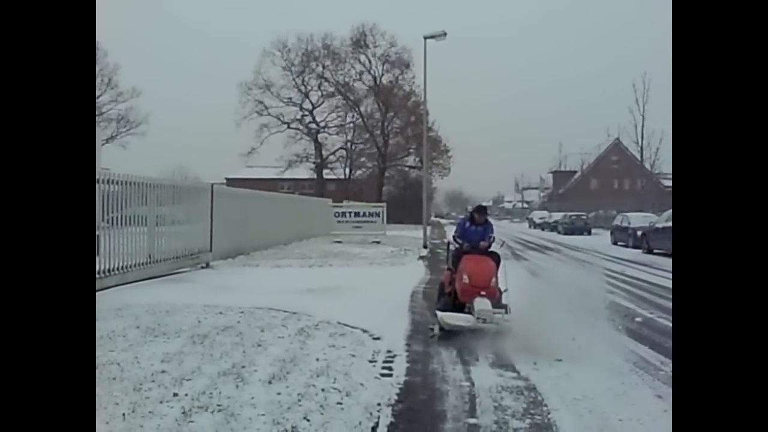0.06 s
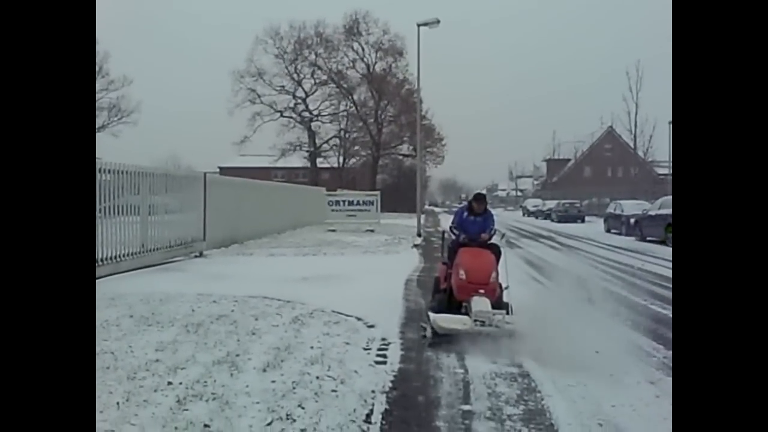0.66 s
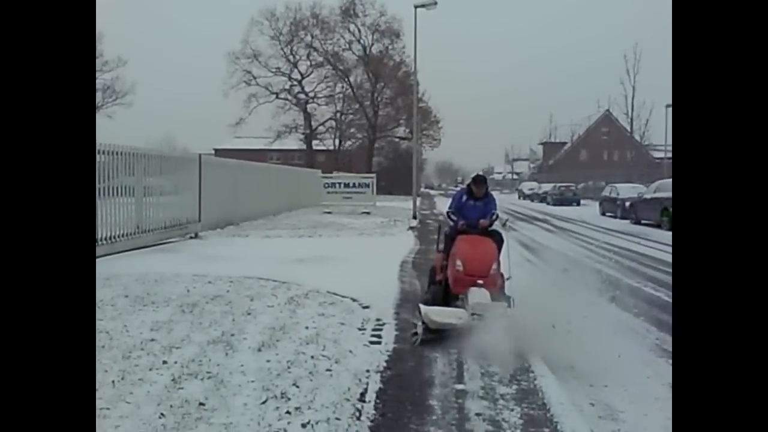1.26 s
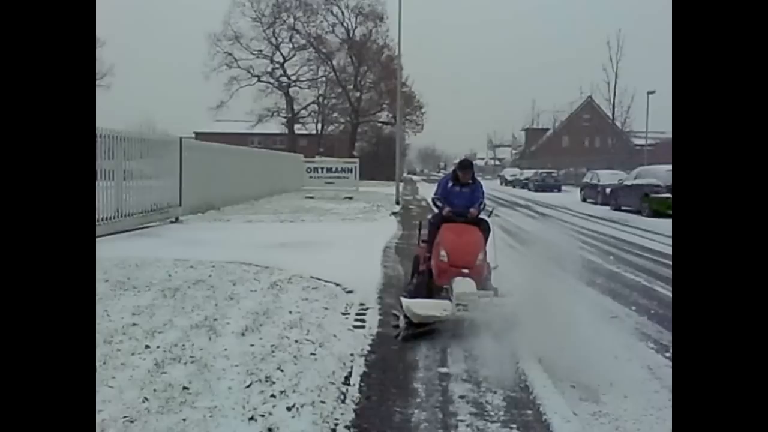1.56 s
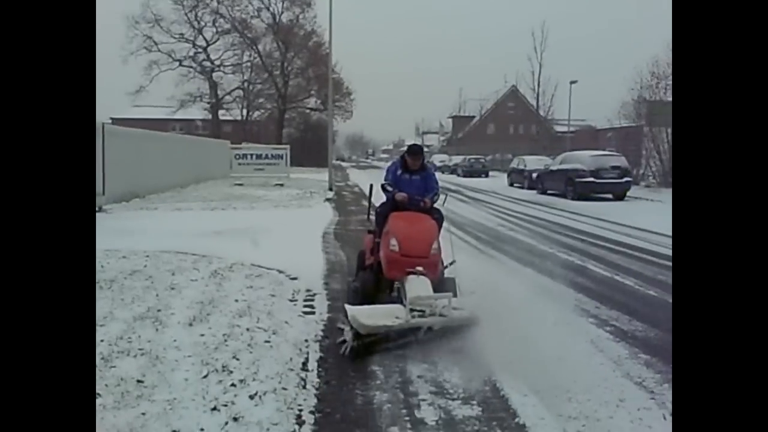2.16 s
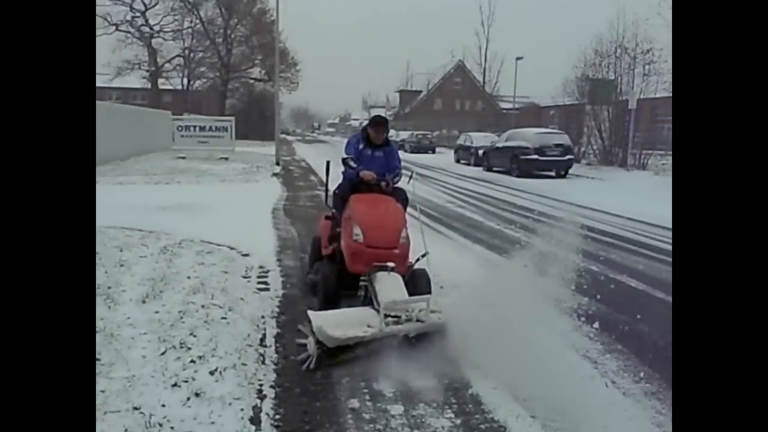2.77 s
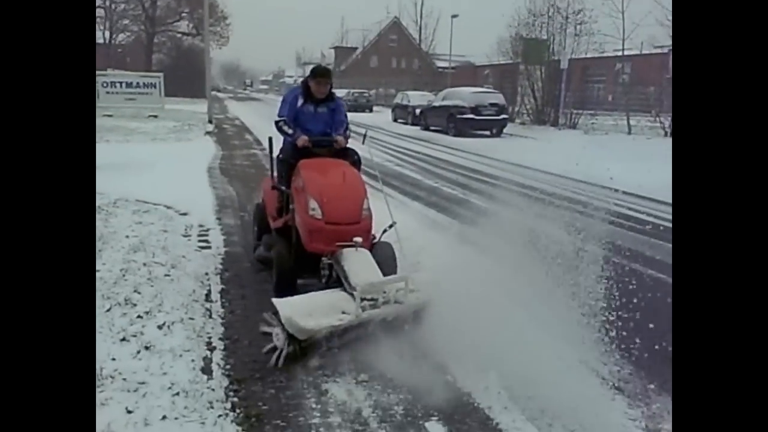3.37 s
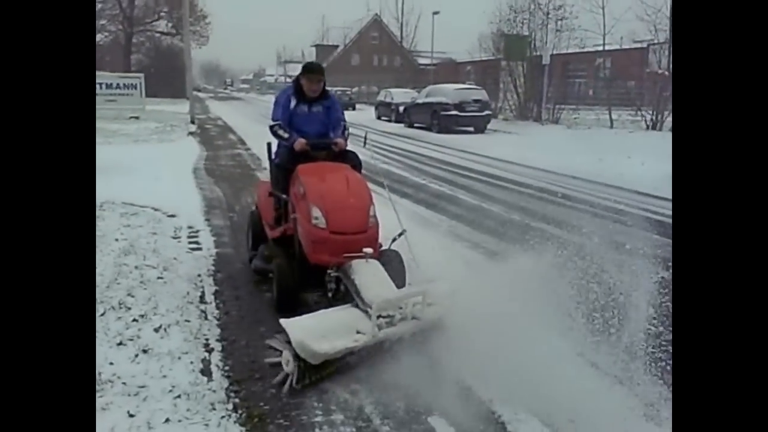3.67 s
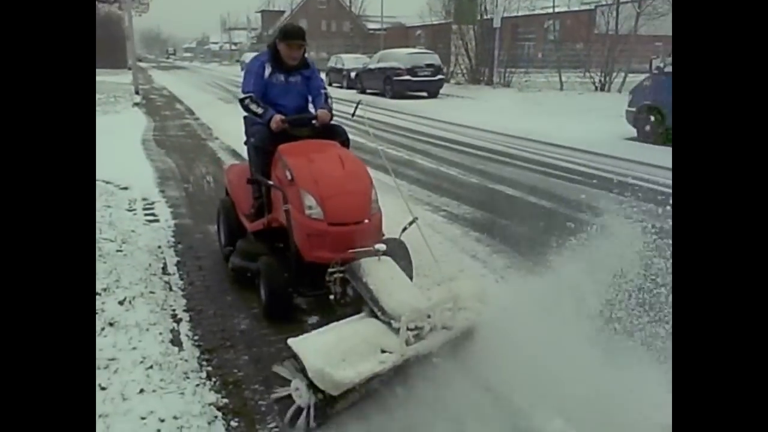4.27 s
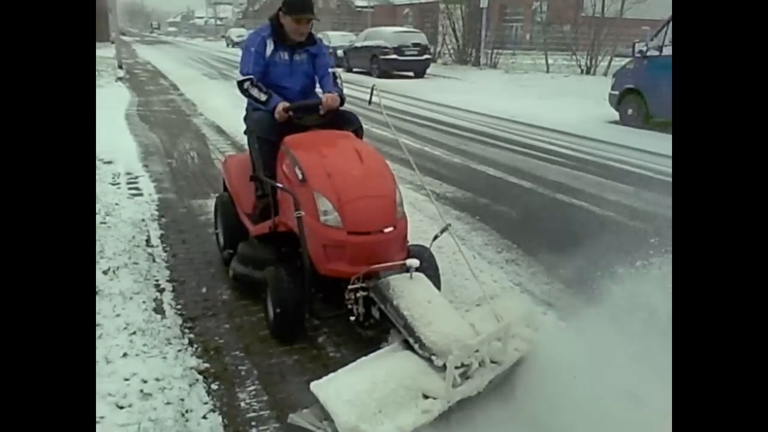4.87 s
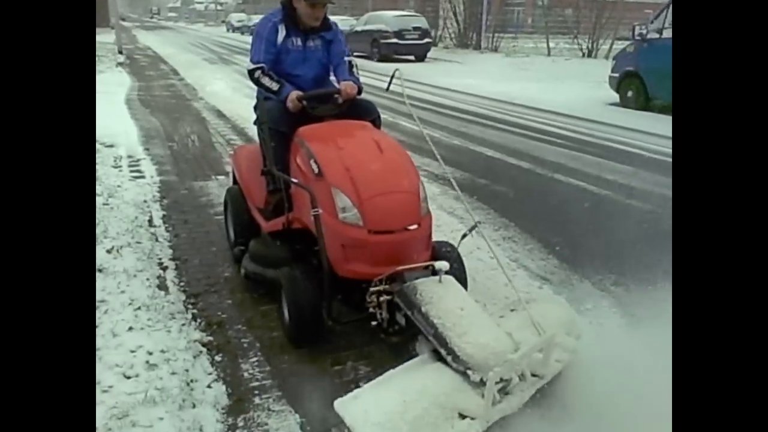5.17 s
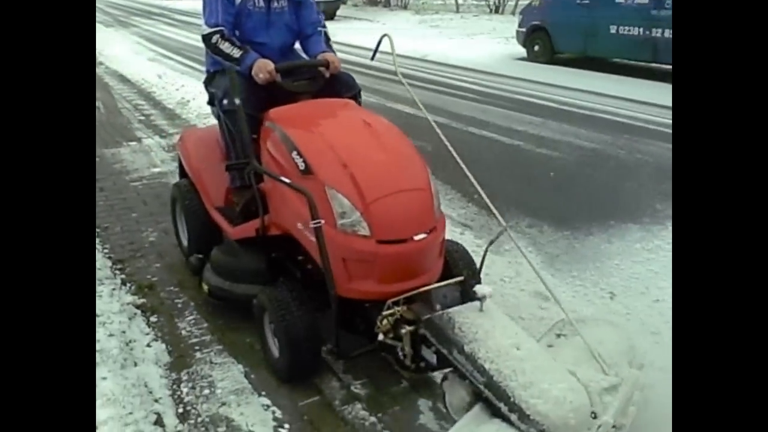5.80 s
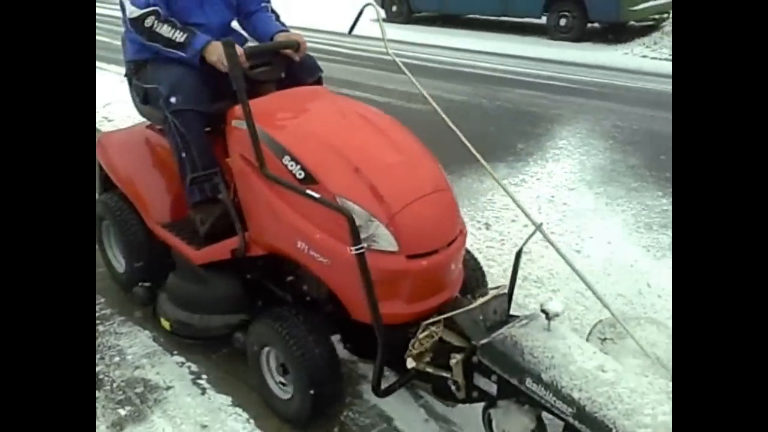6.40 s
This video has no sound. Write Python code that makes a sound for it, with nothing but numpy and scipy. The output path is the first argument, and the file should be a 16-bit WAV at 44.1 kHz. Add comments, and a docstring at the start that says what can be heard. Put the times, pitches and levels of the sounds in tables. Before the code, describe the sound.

Outdoors, the throbbing drone of a small engine grows steadily louder as a ride-on snow sweeper nears the microphone. Engine rattle and whining gears mix with the scrape of bristles and the hiss of flung snow. A brief patch of grit rings on the brush guard near the start, a thin high whine rises and fades midway, and a body panel buzzes briefly at the end, with the machine close by.

```python
"""A ride-on sweeper drives up a snowy pavement towards the microphone.
From the start its two-cylinder engine fires in uneven pairs, slowly speeding up and sagging under the
load; the tailpipe hums, gears whine, the bonnet rings, and the brush scrapes and sprays hissing snow.
In the first two seconds grit hits the brush guard. Near four seconds the brush gear sings loudest.
By the end the machine is close and loud, and a panel gives one last short buzz."""
import sys
import numpy as np
from scipy import signal
from scipy.fft import rfft, irfft, next_fast_len
from scipy.io import wavfile
from scipy.ndimage import uniform_filter1d

SR = 44100
rng = np.random.default_rng(int(sys.argv[2]) if len(sys.argv) > 2 else 0)


def waveform_to_disk(signal):
    """Save audio, clipped to [-1, 1], as 16-bit WAV at the path in sys.argv[1]."""
    frames = np.transpose(np.atleast_2d(signal))
    scaled = np.clip(frames, -1, 1) * 32767
    samples = np.round(scaled).astype(np.int16)
    wavfile.write(sys.argv[1], SR, samples)


N = 288414
TIME = np.arange(N) / SR
CRUISE_HZ = 27  # usual engine cycles a second; one cycle is two turns of the crankshaft

# The engine speed rises and falls under the load: time_s, cycles_per_s
ENGINE_SPEED = [(0.0, 27.04), (0.22, 26.98), (0.89, 27.35), (1.36, 26.3), (1.55, 26.36), (1.83, 27.75),
                (2.39, 27.89), (3.06, 25.82), (3.22, 25.91), (3.56, 27.19), (4.03, 28.06), (4.25, 27.74),
                (4.64, 26.19), (4.87, 25.98), (5.34, 27.32), (5.73, 27.55), (6.12, 28.0), (6.54, 26.88)]
# When and how hard each of the two cylinders fires: share_of_cycle, strength
CYLINDER_FIRINGS = [(.516, .87), (.9, 1.0)]
# The echo off the ground cancels a band of sound, which sinks as the machine nears: time_s, pitch_hz
CANCELLED_BAND = [(0, 694), (2, 728), (3.5, 592), (5, 499), (5.7, 449), (6.2, 381), (6.54, 358)]
# How much snow the brush throws: time_s, level_db
SNOW_THROWN = [(0.05, -48.5), (1.4, -46), (1.59, -47), (1.63, -53.5), (1.88, -56.5), (2.03, -46.5),
               (2.15, -51.5), (2.22, -48.5), (3.0, -40), (4.07, -45), (4.13, -41.5), (4.9, -41),
               (4.94, -43.5), (5.83, -42), (6.5, -39)]


def exhaust(cycles, dip_db=16, dip_octaves=0.21, boost_octaves=0.24, waver_db=0.62, puff_db=-17):
    """Each firing is a push and pull of air that echoes in the silencer, with a puff of swirling gas."""
    # Exhaust tones; an order is a multiple of the engine's cycle rate: order, relative_db
    tones = [(1, -18.5), (2, -9), (3, -9.5), (4, -22), (5, 0), (6, -0.5), (7, -14.5), (8, -1.5), (9, -4.5),
             (10, -10.5), (11, -13.5), (12, -26.5), (13, -12), (14, -13), (15, -24.5), (17, -27),
             (18, -24.5), (19, -19.5), (20, -28.5), (21, -18.5), (22, -19)]
    # Upside-down echoes from the silencer's open end: delay_share_of_cycle, strength
    pipe_echoes = [(.209, -.41), (.264, -.6)]
    # Tone colour of the gas puffs: pitch_hz, relative_db
    puff_spectrum = [(30, -22), (85, -11), (130, -7), (180, -1), (260, 4.5), (330, 2), (400, -5),
                     (470, -11.5), (560, -26.5)]
    speed, dip_hz = curve(ENGINE_SPEED), curve(CANCELLED_BAND)
    # Just below the cancelled band the ground echo adds sound; close by, the direct sound outweighs it.
    boost_hz = 0.67 * dip_hz
    boost_db = np.interp(distance(), [3.2, 3.4], [0, 3])
    pulses = np.zeros(N)
    for order, db in tones:
        pair = sum(size * np.exp(-2j * np.pi * order * at) for at, size in CYLINDER_FIRINGS)
        pipe = 1 + sum(size * np.exp(-2j * np.pi * order * delay) for delay, size in pipe_echoes)
        phase = np.angle(pair * pipe) - np.pi / 6  # firings and echoes set each tone's timing
        tone = np.sin(2 * np.pi * order * cycles + phase)
        dip = np.exp(-(np.log2(order * speed / dip_hz) / dip_octaves) ** 2)
        boost = np.exp(-(np.log2(order * speed / boost_hz) / boost_octaves) ** 2)
        pulses += amp(db - dip_db * dip + boost_db * boost + waver_db * wander(1.3)) * tone
    pulses *= 1 + 0.049 * wander(25)  # no two burns are alike
    gas = rng.standard_normal(N) * throb(cycles, depth=0.24, lag=0.01, sharpness=12)
    puffs = amp(puff_db) * colour(gas, puff_spectrum)
    return loudness(level_db=-28.5, halving_db=6, rev_db=0.6) * (unit(pulses) + puffs)


def clatter(cycles, far_db=-40.5, flicker_db=0.5, ring_hz=1348, hollow_depth=0.43):
    """Valves, pistons and belts rattle in time with the firings; the tone colour shifts with distance."""
    # Tone colour from far off, midway and close by: pitch_hz, relative_db
    far_spectrum = [(330, -29.5), (400, -4.5), (500, -5), (600, -4.5), (720, -6.5), (850, -4.5),
                    (1050, -1.5), (1220, -15), (1400, -6.5), (1600, -11.5), (1830, -19), (2100, -18),
                    (2330, -12.5), (2600, -17), (2900, -30), (3200, -42)]
    mid_spectrum = [(330, -29), (400, -5), (500, -5), (580, 2.5), (700, -3), (800, -4), (930, -2.5),
                    (1150, -2), (1400, -2), (1530, -5), (1720, -12.5), (2050, -10), (2350, -12),
                    (2600, -11), (2900, -24), (3200, -45.5)]
    near_spectrum = [(330, -26.5), (400, -12.5), (470, -11), (540, -1.5), (700, -3.5), (850, -2),
                     (1150, -6.5), (1350, -4.5), (1570, -5.5), (1760, -12.5), (1900, -15.5), (2130, -11.5),
                     (2330, -7.5), (2550, -12.5), (2900, -19.5), (3200, -45.5)]
    # A quieter band in the clatter moves as the machine nears: time_s, pitch_hz
    hollow = [(1.5, 1880), (2.0, 1640), (2.7, 1610), (4.0, 1774), (6.54, 1850)]
    rattle = grains(per_s=12000, spread_db=1.5) * throb(cycles, depth=0.18, lag=0.024, sharpness=6.1)
    rattle *= amp(flicker_db * wander(22))
    far = np.interp(distance(), [5.1, 7.16], [0, 1])
    near = np.interp(distance(), [3.5, 4.6], [1, 0])
    sound = far * colour(rattle, far_spectrum)
    sound += (1 - far - near) * colour(rattle, mid_spectrum)
    sound += near * colour(rattle, near_spectrum)
    sound -= hollow_depth * resonate(sound, curve(hollow), width_hz=330)
    shaken_db = -13 + 5 * (curve(ENGINE_SPEED) - CRUISE_HZ)  # the bonnet rings harder at high speed
    ring = unit(resonate(rng.standard_normal(N), ring_hz, width_hz=60))
    bonnet = amp(shaken_db) * (1 - 0.8 * far) * ring
    close_level = loudness(level_db=-36.5, halving_db=7, rev_db=0.06)
    level = far * amp(far_db) + (1 - far) * close_level  # steady while far off
    return level * (sound + bonnet)


def brush(cycles, usual_snow_db=-44, spray_db=-0.18, flicker_db=0.5):
    """Bristles, shaken by the engine, flick over the paving and fling grains of snow."""
    # Tone colour of the scraping bristles and of the flying snow: pitch_hz, relative_db
    scrape_spectrum = [(2400, -33), (2800, -0.5), (3200, 2), (3600, 0.5), (4000, -0.5), (4500, -2.5),
                       (4900, -13.5), (5500, -28)]
    spray_spectrum = [(4200, -25), (4700, -6), (5000, -4), (5400, -2), (5750, -1.5), (6150, 0), (6450, -1),
                      (6700, -7.5), (6900, -16.5), (7100, -28.5), (7350, -47.5)]
    snow_db = curve(SNOW_THROWN)
    bristles = grains(per_s=16000, spread_db=1.6) * throb(cycles, depth=0.27, lag=0.04, sharpness=4)
    load = amp(0.5 * (snow_db - usual_snow_db))  # more snow scrapes louder
    scrape = loudness(level_db=-47, halving_db=5.5, rev_db=0.05) * load * colour(bristles, scrape_spectrum)
    spray = amp(snow_db + spray_db) * colour(grains(per_s=22000, spread_db=1.5), spray_spectrum)
    return (scrape + spray) * amp(flicker_db * wander(24))


def drive_whine(cycles, waver_db=2.5, jitter=0.23):
    """Tones of the crankshaft and drive swell as they glide past the pitches where the bonnet rings."""
    # The whining tones, as two matching lists: order; relative_db
    orders = [24, 26, 28, 30, 32, 36, 40, 44, 54, 60, 80, 84]
    levels_db = [-16, -16, -14.5, -27, -18.5, -19, -16.5, -24, -29, -22.5, -31, -30]
    # Where the bonnet panels ring: pitch_hz, width_hz, lift_db
    panels = [(716, 14, 6), (1150, 23, 4)]
    out = np.zeros(N)
    for order, db in zip(orders, levels_db):
        panels_db = sum(lift(order, *panel) for panel in panels)
        angle = 2 * np.pi * (order * cycles + rng.random()) + jitter * wander(8.3)
        out += amp(db + panels_db + waver_db * wander(3.3)) * np.sin(angle)
    return loudness(level_db=-37.5, halving_db=11.5, rev_db=0.5) * out


def tailpipe_hum(cycles, order=16, flutter=0.074, dip_octaves=0.15):
    """One tone swells near the tailpipe's own pitch and vanishes where the ground echo cancels it."""
    tone = np.sin(2 * np.pi * order * (cycles - CYLINDER_FIRINGS[1][0]))
    tone = unit(tone * (1 + flutter * wander(11)))
    octaves_apart = np.log2(order * curve(ENGINE_SPEED) / curve(CANCELLED_BAND))
    ground_gain = abs(octaves_apart) / np.hypot(octaves_apart, dip_octaves)
    pipe_gain = amp(lift(order, hz=447.3, width_hz=22.5, peak_db=8))
    return loudness(level_db=-46, halving_db=2, rev_db=-0.5) * pipe_gain * ground_gain * tone


def singing_panels(cycles, jitter=0.11, flutter=0.21):
    """Three wavering tones of the drive sing out when high speed carries them to a panel's own pitch."""
    # Each tone and its panel: order, level_db, halving_db, panel_hz, width_hz, lift_db
    tones = [(42, -58, 7.5, 1176, 16, 10), (48, -59, 6.5, 1334, 33, 9.5), (56, -59.5, 21.5, 1562, 30, 5)]
    # Now and then a panel buzzes louder for a moment: middle_s, half_length_s, order, lift_db
    buzzes = [(0.7, .2, 48, 6), (1.92, .13, 48, 5.5), (3.95, .28, 48, 7), (4.118, 0.41, 42, 7.5),
              (6.31, 0.17, 48, 14.5)]
    out = np.zeros(N)
    for order, db, halving_db, *panel in tones:
        buzz_db = sum(peak * swell(middle, half) for middle, half, which, peak in buzzes if which == order)
        tone = np.sin(2 * np.pi * order * cycles + jitter * wander(16))
        tone *= 1 + flutter * wander(5.3)
        out += loudness(db, halving_db, rev_db=-1.5) * amp(lift(order, *panel) + buzz_db) * unit(tone)
    return out


def brush_guard(ring_hz=890, ring_db=-52.5, sizzle_db=-13):
    """Bristles and snow keep the metal guard over the brush ringing; each patch of grit makes it swell."""
    # Patches of grit flung at the guard: middle_s, half_length_s, ring_db, sizzle_db
    grit = [(0.8, 0.48, -62, -56.5), (1.383, 0.11, -42, -53), (1.67, 0.061, -54, -62)]
    sizzle_hz = np.interp(TIME, [0.5, 1.3], [6090, 6220])
    ring = unit(resonate(grains(per_s=900, spread_db=3.5), ring_hz, width_hz=120))
    sizzle = unit(resonate(grains(per_s=4300, spread_db=1.5), sizzle_hz, width_hz=240))
    out = amp(ring_db) * ring + amp(curve(SNOW_THROWN) + sizzle_db) * sizzle
    for middle, half, grit_ring_db, grit_sizzle_db in grit:
        out += swell(middle, half) * (amp(grit_ring_db) * ring + amp(grit_sizzle_db) * sizzle)
    return out


def brush_gear(order=75.7, jitter=0.35, flutter=0.25):
    """The brush gear sings thinly; its belt slips, so its pitch sags more than the engine's does."""
    # How loud the gear sings: time_s, level_db
    levels = [(0, -70), (3.2, -58), (3.9, -50), (5.3, -56), (6.54, -66)]
    speed = curve(ENGINE_SPEED)
    belt_grip = (speed / speed.max()) ** (2 / 3)
    waves = np.cumsum(order * speed * belt_grip) / SR
    tone = np.sin(2 * np.pi * waves + jitter * wander(18))
    tone *= 1 + flutter * wander(18)
    return amp(curve(levels)) * unit(tone)


def distance(start_m=8.87, drive_m_per_s=1.304, aside_m=2.944):
    """Metres from the machine to the microphone, which stands to one side of its path."""
    return np.hypot(start_m - drive_m_per_s * TIME, aside_m)


def loudness(level_db, halving_db, rev_db):
    """Gain: level_db at 5 m, plus halving_db as distance halves and rev_db per extra cycle a second."""
    halvings = np.log2(5 / distance())
    return amp(level_db + halving_db * halvings + rev_db * (curve(ENGINE_SPEED) - CRUISE_HZ))


def throb(cycles, depth, lag, sharpness):
    """A level that swells just after each firing; lag is a share of the cycle."""
    bursts = sum(size * np.exp(sharpness * (np.cos(2 * np.pi * (cycles - at - lag)) - 1))
                 for at, size in CYLINDER_FIRINGS)
    return unit(1 + depth * bursts)


def grains(per_s, spread_db):
    """Tiny impacts at random moments, a few of them larger."""
    size = amp(spread_db * np.minimum(rng.exponential(1, N), 4))
    return unit(size * rng.standard_normal(N) * (rng.random(N) < per_s / SR))


def lift(order, hz, width_hz, peak_db):
    """Decibels that an engine tone gains near the pitch at which a part rings."""
    return peak_db / (1 + (2 * (order * curve(ENGINE_SPEED) - hz) / width_hz) ** 2)


def resonate(x, hz, width_hz):
    """Keeps the band around hz (a number or a curve): shifts it to zero, smooths twice, shifts back."""
    turn = np.exp(2j * np.pi * np.cumsum(hz * np.ones(N)) / SR)
    decay = np.exp(-np.pi * width_hz / SR)
    smoothed = signal.lfilter([(1 - decay) ** 2], [1, -2 * decay, decay ** 2], x / turn)
    return 2 * (turn * smoothed).real


def colour(x, spectrum):
    """Gives x a tone colour, silent beyond the table's ends, at an average level of 1."""
    size = next_fast_len(N)
    hz, db = np.transpose(spectrum)
    log_hz = np.log(np.fft.rfftfreq(size, 1 / SR) + 1)
    gain = amp(np.interp(log_hz, np.log(hz + 1), db, left=-np.inf, right=-np.inf))
    return unit(irfft(rfft(x, size) * gain, size)[:N])


def wander(per_s):
    """A smooth random drift of typical size 1 that changes about per_s times a second."""
    count = N // 64
    keep_slow = np.exp(-(np.fft.rfftfreq(count, 64 / SR) / per_s) ** 2)
    drift = irfft(rfft(rng.standard_normal(count)) * keep_slow, count)
    return np.interp(np.arange(N) / 64, np.arange(count), unit(drift))


def swell(middle_s, half_s):
    """A smooth rise and fall, 1 at its middle."""
    return np.exp(-((TIME - middle_s) / half_s) ** 2)


def curve(rows):
    """Joins rows of time and value with straight lines."""
    return np.interp(TIME, *np.transpose(rows))


def amp(db):
    """Decibels to gain."""
    return 10 ** (np.asarray(db) / 20)


def unit(x):
    """Scales to an average (rms) level of 1."""
    return x / np.sqrt(np.mean(x ** 2) + 1e-20)


def scene():
    """Engine and brush follow the one crankshaft, whose flywheel smooths the speed."""
    cycles = np.cumsum(uniform_filter1d(curve(ENGINE_SPEED), size=4000)) / SR  # engine cycles so far
    engine = exhaust(cycles) + tailpipe_hum(cycles)
    machinery = drive_whine(cycles) + singing_panels(cycles) + clatter(cycles)
    return (engine + machinery + brush_gear() + brush(cycles) + brush_guard())[None]


def record(dry):
    """The microphone loses the treble above 7250 Hz."""
    low_pass = signal.firwin(511, 7250, window=("kaiser", 9), fs=SR)
    return signal.oaconvolve(dry, low_pass[None], "same", axes=1)


dry = scene()
out = record(dry)
waveform_to_disk(out)
```